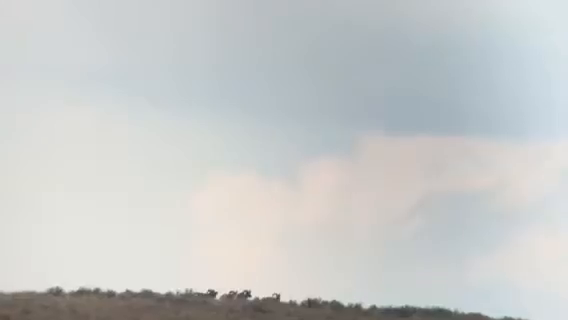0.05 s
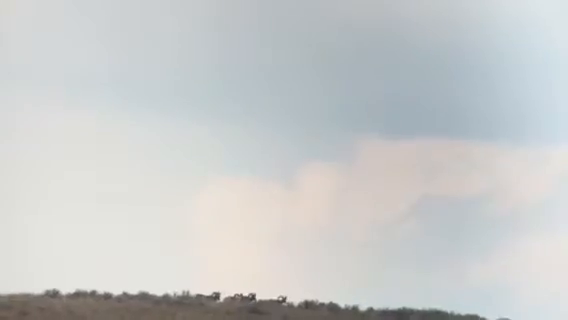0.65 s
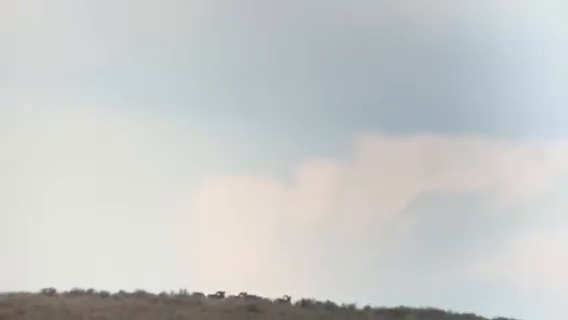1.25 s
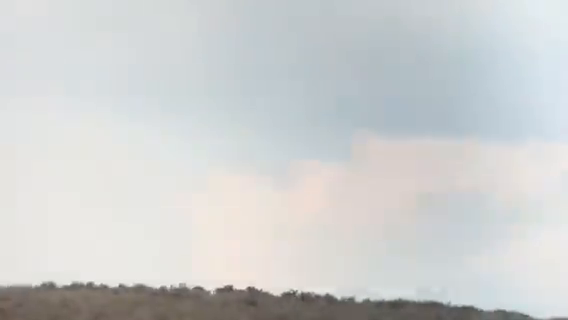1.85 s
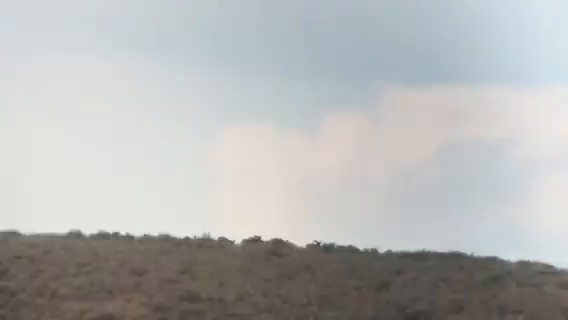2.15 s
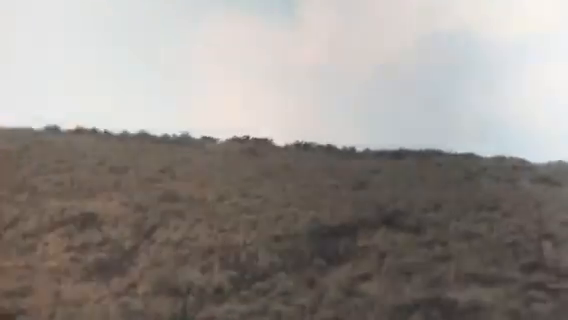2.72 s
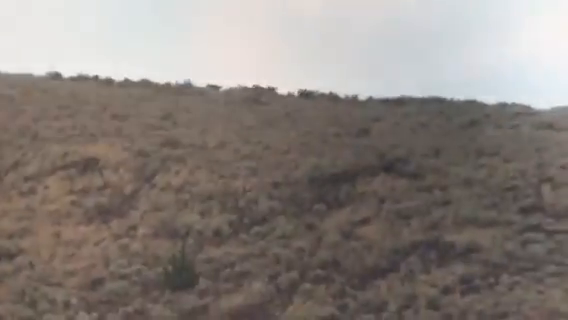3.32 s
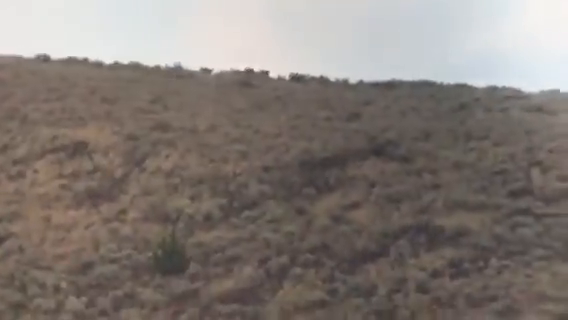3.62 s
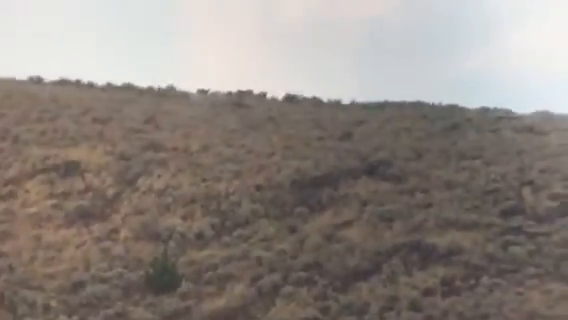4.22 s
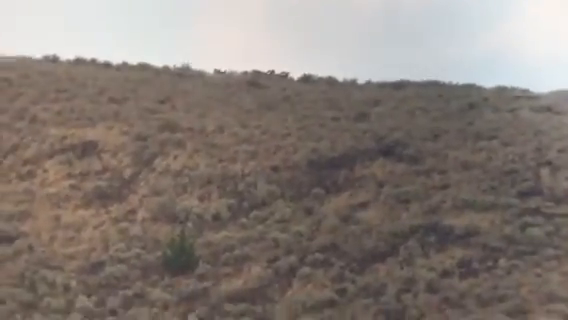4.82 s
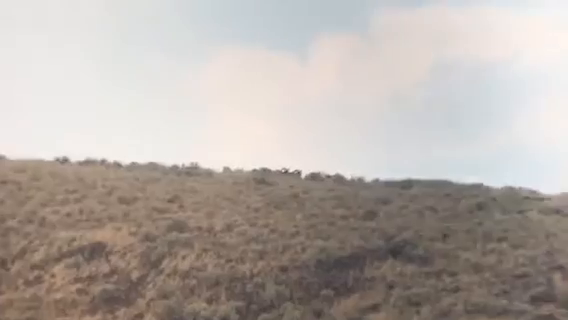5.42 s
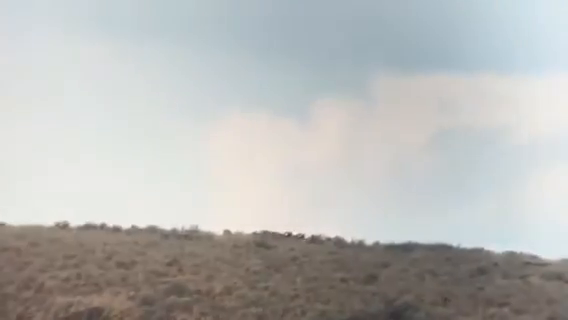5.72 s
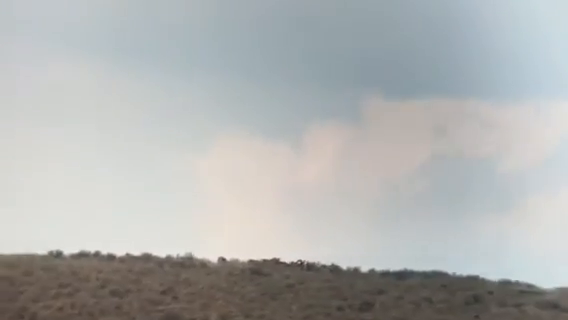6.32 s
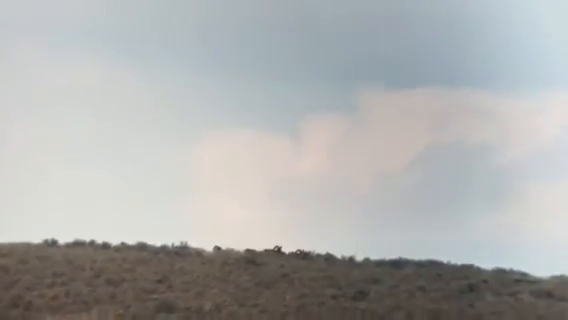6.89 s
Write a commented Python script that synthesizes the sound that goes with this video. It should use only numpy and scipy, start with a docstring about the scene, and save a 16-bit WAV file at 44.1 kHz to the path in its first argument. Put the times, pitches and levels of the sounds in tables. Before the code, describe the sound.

Strong, uneven wind thumps and roars against the microphone outdoors, drops into brief lulls with faint hiss, then returns.

```python
"""Gusty hillside wind blows across a small camera microphone: large eddies rumble on the port,
smaller ones roar, the smallest rasp in fast air. An early gust tears at the rim of the port, then
the wind runs strong, single eddies striking as short buffets. From about 3.7 s it eases, and its
lulls leave a far rush, a few faint peeps and a soft hiss. Just after 6 s it returns hard,
tearing at the rim again, and blows to the end."""
import sys
import numpy as np
from scipy import signal
from scipy.fft import rfft, irfft, next_fast_len
from scipy.io import wavfile
from scipy.ndimage import uniform_filter1d, map_coordinates

SR = 44100
rng = np.random.default_rng(int(sys.argv[2]) if len(sys.argv) > 2 else 0)


def wrap_up_sound(samples):
    """Save the sound to the file named by the first command line argument, as 16-bit audio."""
    columns = np.atleast_2d(samples).T
    # keep every value between -1 and 1, then stretch to whole-number steps
    tamed = np.clip(columns, -1, 1)
    steps = np.round(tamed * 32767).astype(np.int16)
    wavfile.write(sys.argv[1], SR, steps)


N = 315315


def wind():
    """Turbulent pressure on the port: a cascade of eddies, from deep rumble to fine fizz."""
    # the slow run of the wind: t/s, strength over the usual wind/dB, extra rumble/dB
    slow_run = [(0.0, -8.5, 6), (0.5, -1.0, 1.5), (0.68, 6.5, -1), (0.97, 1.5, -1.5), (1.1, 7.5, -1.5),
                (1.25, -2.5, 2.5), (1.48, -2, 1.5), (1.78, 2, -4), (2.16, -0.5, 3), (2.61, -7.5, -1),
                (2.93, -0.5, 2), (3.54, 0.5, 1.5), (3.7, -9.5, 4.5), (4.15, -9, -0.5), (4.6, -6.0, 0.5),
                (5.1, -8.5, 1), (5.69, -6.5, 4), (6.12, -11.5, 1.5), (6.26, 4, 3.5), (6.61, 1.0, -9),
                (7.01, 3.5, 4.5), (7.15, 3.5, 3.5)]
    # pressure spectra of five sizes of eddy, largest first: f/Hz, level/dB
    rumble_spectrum = [(18, -39.5), (28, -25), (40, -4.5), (54, -1), (78, 2), (125, -1.5), (190, -4.5),
                       (240, -18), (330, -51)]
    roar_spectrum = [(130, -46), (175, -9.5), (220, 2), (290, -1.5), (390, -4), (460, -8), (540, -23),
                     (700, -53)]
    rush_spectrum = [(350, -34), (460, -7.5), (520, 2), (600, -1.5), (700, -7.5), (820, -17.5), (1100, -50)]
    rasp_spectrum = [(500, -36), (660, -5), (770, -2.5), (930, -6), (1150, -16), (1400, -28.5), (2000, -62)]
    fizz_spectrum = [(850, -24.5), (1100, -4), (1300, -3), (1500, -11), (1750, -18), (2300, -34),
                     (3200, -52), (5000, -68)]
    run_db, weight_db = curves(slow_run)
    wind_db = run_db + gusts()
    surge_db = surges(wind_db)
    # small eddies gain most from faster air, then level off in the hardest gusts
    ceiling_db, knee_db = 5.5, 3
    capped_db = -knee_db * np.logaddexp(-wind_db / knee_db, -ceiling_db / knee_db)
    rumble_db = -35 + 0.64 * wind_db + weight_db + surge_db
    roar_db = -41 + wind_db + surge_db
    rasp_db = -58 + 2.34 * capped_db + surge_db
    thump, blast, scrape = buffets(stray_eddies(rumble_db, roar_db, rasp_db))
    # eddies come in clumps, so all sizes flutter together; the rumble also heaves on its own
    flutter = wobble(rate=85)
    heave = wobble(rate=49)
    rumble = np.sqrt(amp(rumble_db + 1.1 * flutter + 1.9 * heave) ** 2 + thump)
    roar = np.sqrt(amp(roar_db + 2.7 * flutter) ** 2 + blast)
    rasp = np.sqrt(amp(rasp_db + 0.76 * flutter) ** 2 + scrape)
    # the eddies between roar and rasp take their strength from both
    rush = amp(-0.5) * roar * (rasp / roar) ** 0.39
    # the finest eddies grow fastest, so hard gusts sound brighter
    fizz = amp(-66.5) * (rasp / amp(-48)) ** 1.6
    # the middle sizes also tumble, each on its own
    pressure = (rumble * carried(eddies(rumble_spectrum, life=0.022), wind_db)
                + roar * amp(2.13 * wobble(rate=90)) * eddies(roar_spectrum, life=0.025)
                + rush * amp(1.8 * wobble(rate=110)) * eddies(rush_spectrum, life=0.026)
                + rasp * amp(2.3 * wobble(rate=160)) * eddies(rasp_spectrum, life=0.0045)
                + fizz * eddies(fizz_spectrum, life=0.0028))
    return pressure * signal.windows.tukey(N, 0.002)


def eddies(spectrum, life):
    """An unbroken train of eddies: random in shape, about equal in strength over each life (s)."""
    x = noise(spectrum)
    colour = np.abs(rfft(x))
    span = max(int(life * SR), 2)
    for _ in range(2):
        power = uniform_filter1d(uniform_filter1d(x ** 2, span), span)
        even = rfft(x / np.sqrt(np.abs(power) + 1e-9))
        x = irfft(colour * even / (np.abs(even) + 1e-12), len(x))  # evening out keeps the colour
    return unit(x[:N])


def gusts():
    """Quick gusts and lulls that ride on the slow run of the wind, in dB of strength."""
    # gusts, and lulls where negative: middle t/s, half width/s, change of strength/dB
    swings = [(0.11, 0.011, -5.5), (0.228, 0.015, -11), (0.385, 0.038, 11), (0.514, 0.022, -9.5),
              (0.965, 0.023, -4), (1.618, 0.014, -3), (1.675, 0.012, -2.5), (1.905, 0.033, -7.5),
              (2.162, 0.032, -4.5), (2.377, 0.025, -13), (2.466, 0.018, 8), (2.538, 0.019, -5),
              (2.727, 0.017, 4.5), (2.822, 0.015, -4), (3.305, 0.013, -5), (3, 0.024, -13),
              (3.195, 0.021, -9.5), (3.385, 0.011, -9.5), (3.644, 0.026, -18.5), (3.89, 0.025, -8),
              (3.946, 0.029, 9), (4.136, 0.049, 7), (4.288, 0.013, -7), (4.459, 0.019, -4.5),
              (4.726, 0.068, -34), (4.965, 0.013, -8), (5.294, 0.037, -15.5), (5.372, 0.032, 17),
              (5.452, 0.04583, -31), (5.617, 0.044, 5), (5.766, 0.029, -17), (5.882, 0.0092, 6.5),
              (5.977, 0.029, -5), (6.378, 0.027, -8.5), (6.446, 0.038, 2.0), (6.89, 0.0098, -5.5)]
    t = np.arange(N) / SR
    return sum(db * swell((t - s) / width, rise=1) for s, width, db in swings)


def surges(wind_db):
    """Random surges in dB: light air comes in puffs, a strong wind flows more evenly."""
    depth_db = np.interp(wind_db, [-8, 4], [2.5, 1.78])
    return depth_db * wobble(rate=45)


def carried(rumble, wind_db, slow_air_db=-10):
    """Slow air carries eddies past more slowly: below slow_air_db the rumble drops in pitch."""
    pace = amp(0.15 * np.minimum(wind_db - slow_air_db, 0))
    return map_coordinates(rumble, [np.cumsum(pace)], order=1, mode="mirror")


def buffets(strays, attack_s=0.002, thump_lag_s=0.0037):
    """Power of thump, roar and rasp: an eddy hits fast and passes more slowly, its thump just behind."""
    # eddies that hit the port: peak t/s, thump/dB, roar/dB, rasp/dB, time to pass/s
    hits = [(0.006, -21, -26.5, -48.5, 0.018), (0.073, -22.5, -30, -70, 0.0064),
            (0.13, -29, -32.5, -61, 0.006), (0.168, -30, -37, -57.5, 0.011),
            (0.274, -31, -34.5, -56, 0.011), (0.337, -30.5, -34, -47, 0.015),
            (0.367, -18, -20.5, -42, 0.01), (0.407, -27, -32, -43, 0.014),
            (0.584, -36, -29.5, -47.5, 0.0053), (0.614, -18, -34, -51.0, 0.0098),
            (0.666, -17.5, -33, -52, 0.0064), (0.685, -27.5, -24.5, -41, 0.0079),
            (1.018, -24.5, -32.5, -44.5, 0.014), (1.207, -25.5, -31, -71, 0.0072),
            (1.269, -21.5, -38, -72, 0.0061), (1.327, -29.5, -29, -50.5, 0.015),
            (1.458, -25.5, -31.5, -59, 0.0064), (1.525, -38.5, -35, -54, 0.012),
            (1.585, -23.5, -33.5, -56.5, 0.0079), (1.639, -17.5, -25.5, -60, 0.0086),
            (1.708, -19.5, -34, -52, 0.0091), (1.745, -25, -33, -44.5, 0.019),
            (1.771, -21.5, -33.5, -40.5, 0.011), (1.847, -22, -30, -48.5, 0.0083),
            (1.944, -24.5, -31.5, -49, 0.012), (1.983, -30, -38, -46.5, 0.012),
            (2.022, -25.5, -41, -58, 0.01), (2.075, -30.5, -36, -64, 0.0079),
            (2.173, -23, -34.5, -58, 0.013), (2.225, -24.0, -30, -48.5, 0.013),
            (2.307, -23.5, -44, -72, 0.012), (2.334, -24.5, -42.5, -51.5, 0.0089),
            (2.437, -27, -28.5, -44.5, 0.011), (2.457, -14, -35, -48, 0.0074),
            (2.566, -34, -34.5, -62.5, 0.012), (2.673, -29.5, -41.5, -63, 0.026),
            (2.786, -25.5, -29, -56.5, 0.0075), (2.883, -42, -39, -48.5, 0.012),
            (3.244, -22, -26.5, -48, 0.011), (3.269, -25.5, -40.5, -52.5, 0.012),
            (3.308, -26, -45.5, -73, 0.008), (3.346, -25.5, -24.5, -50, 0.0064),
            (3.445, -34, -36.5, -58.5, 0.019), (3.524, -20, -29.5, -52, 0.022),
            (3.713, -29.5, -41, -82, 0.0055), (3.824, -34.5, -38, -62, 0.019),
            (3.847, -24, -35, -65.5, 0.0061), (3.944, -28, -40, -57, 0.0068),
            (3.961, -36, -36, -53, 0.0092), (4.017, -31, -50, -67.0, 0.016), (4.145, -44, -41, -48, 0.015),
            (4.183, -29.5, -39, -60.5, 0.013), (4.249, -31.5, -38.5, -72, 0.0089),
            (4.32, -34, -36, -55.5, 0.015), (4.37, -33, -32, -49.5, 0.0074), (4.41, -30, -36, -63, 0.017),
            (4.488, -23, -25.5, -47, 0.011), (4.504, -23, -47.5, -66.0, 0.0036),
            (4.636, -29, -40, -78, 0.012), (4.845, -47, -40, -68, 0.0097), (4.918, -27.5, -35, -64, 0.014),
            (4.992, -29, -37, -58.5, 0.011), (5.05, -21, -30, -56.5, 0.0076), (5.072, -23, -34, -59, 0.015),
            (5.151, -35, -36, -65.5, 0.025), (5.21, -25, -42, -71, 0.0046),
            (5.239, -25.5, -31.5, -66, 0.011), (5.351, -30.5, -31, -58, 0.008),
            (5.522, -29.5, -34, -60, 0.016), (5.597, -35, -27, -46.5, 0.021), (6.18, -27, -37, -66, 0.023),
            (6.233, -25.5, -24.5, -48.5, 0.0068), (6.247, -22.5, -36.5, -55.5, 0.0061),
            (6.281, -23.5, -25, -43, 0.01), (6.317, -26, -39.5, -56.5, 0.0068),
            (6.412, -27, -35, -46, 0.0085), (6.45, -24, -31, -50, 0.014), (6.469, -24.5, -29, -46.5, 0.014),
            (6.52, -26.5, -49, -64, 0.022), (6.728, -22.5, -32, -47.5, 0.021),
            (6.776, -26.5, -45, -46.0, 0.012), (6.839, -26.5, -39.5, -47.5, 0.011),
            (6.916, -23.5, -41.5, -46, 0.0067), (6.958, -24.5, -42, -56, 0.017),
            (6.991, -20.5, -28.5, -44.5, 0.012), (7.027, -28, -29.5, -51.5, 0.0089),
            (7.078, -34, -29.5, -51, 0.019)]
    t = np.arange(N) / SR
    thump, roar, rasp = np.zeros((3, N))
    for s, thump_db, roar_db, rasp_db, pass_s in list(hits) + strays:
        near = slice(max(int((s - 0.1) * SR), 0), int((s + 0.1) * SR))
        age = t[near] - s
        hit = swell(age / pass_s, rise=attack_s / pass_s)
        thump[near] += amp(thump_db) ** 2 * swell((age - thump_lag_s) / pass_s, rise=0.59)
        roar[near] += amp(roar_db) ** 2 * hit
        rasp[near] += amp(rasp_db) ** 2 * hit
    return thump, roar, rasp


def stray_eddies(rumble_db, roar_db, rasp_db, gap_s=0.12, pass_s=0.006, roar_limit_db=-41):
    """Rows of small extra buffets at random moments, as strong as the wind that carries them."""
    chance = rng.standard_normal((200, 3))
    times = gap_s * (np.arange(len(chance)) + chance[:, 0] / 2)
    accents_db = 2 + 0.9 * chance[:, 1:]
    rows = []
    for s, (low_db, high_db) in zip(times, accents_db):
        at = int(s * SR)
        if 0 <= at < N:
            trim_db = min(roar_limit_db - roar_db[at], 0)  # they stay small however hard it blows
            rows.append((s, rumble_db[at] + low_db + trim_db, roar_db[at] + high_db + trim_db,
                         rasp_db[at] + high_db + trim_db - 2.5, pass_s))
    return rows


def rim_tear():
    """A ragged edge on the hardest gusts, where the air tears at the rim of the port."""
    # crests of those gusts: t/s, half width/s, level/dB
    crests = [(0.377, 0.032, -65.5), (0.68, 0.013, -70.5), (2.463, 0.009, -68), (6.275, 0.02, -72),
              (6.456, 0.028, -66.5), (6.765, 0.035, -73), (6.996, 0.011, -69), (7.09, 0.02, -74.5)]
    # colour of the tearing air: f/Hz, level/dB
    spectrum = [(1100, -14), (1500, 1), (1800, -3), (2100, -5.5), (2400, -14), (2750, -26), (4000, -44)]
    t = np.arange(N) / SR
    strength = sum(amp(db) * swell((t - s) / width, rise=1) for s, width, db in crests)
    ragged = amp(2 * wobble(rate=260))
    return strength * unit(ragged * eddies(spectrum, life=0.0061))


def far_wind():
    """Wind in the brush further off: a soft rush that stays through the lulls."""
    # colour of the wind in the brush: f/Hz, level/dB
    spectrum = [(120, -3.5), (300, 0.5), (470, -7), (850, -11.5), (1100, -20), (1600, -33.5)]
    return amp(-72 + 1.5 * wobble(rate=3.9)) * noise(spectrum)[:N]


def peeps(half_length_s=0.01):
    """Short, slightly wavering notes, perhaps a far bird, that barely clear the hiss."""
    # the peeps: t/s, f/Hz, level/dB
    notes = [(0.93, 2040, -77), (2.228, 2150, -76), (2.5, 1990, -76), (2.61, 2210, -77.5),
             (2.853, 2230, -77), (3.04, 2200, -79), (4.9, 2120, -79), (5.706, 2394, -76),
             (6.062, 2060, -79)]
    t = np.arange(N) / SR
    waver = 1 + 0.014 * wobble(rate=90)
    phase_per_hz = 2 * np.pi * np.cumsum(waver) / SR
    return sum(amp(db) * swell((t - s) / half_length_s, rise=0.95) * np.sin(hz * phase_per_hz)
               for s, hz, db in notes)


def hiss():
    """A faint, broad bed of hiss under the wind."""
    # the hiss lifts a little during the quiet stretch: t/s, level/dB
    levels = [(0, -77), (3.2, -77), (4.2, -76.5), (6.1, -76.5), (6.6, -77.5)]
    # colour of the hiss: f/Hz, level/dB
    spectrum = [(100, 6), (900, -1), (2000, 2.5), (3000, 0), (4400, -1.5), (4950, -5), (5400, -2.5),
                (6700, -3.5), (7700, -6.5), (9300, -5), (10400, -10.5), (11400, -8), (15500, -11)]
    level_db, = curves(levels)
    return amp(level_db) * noise(spectrum)[:N]


def noise(spectrum):
    """Noise of rms 1 coloured by (f/Hz, level/dB) points, a little longer than the scene."""
    size = next_fast_len(N + 8192, real=True)
    hz, db = np.transpose(spectrum)
    log_hz = np.log(np.fft.rfftfreq(size, 1 / SR) + 1)
    gain = amp(np.interp(log_hz, np.log(hz), db, left=-120, right=-120))
    return unit(irfft(rfft(rng.standard_normal(size)) * gain, size))


def wobble(rate):
    """A smooth random curve, rate knots a second."""
    return map_coordinates(rng.standard_normal(4096), [np.arange(N) * rate / SR], mode="wrap")


def swell(age, rise):
    """A bell around age 0; rise is its front length as a share of its back."""
    return np.exp(-np.where(age < 0, age / rise, age) ** 2)


def curves(rows):
    """One value per sample for each column after the time."""
    times, *columns = np.transpose(rows)
    return [np.interp(np.arange(N) / SR, times, column) for column in columns]


def amp(db):
    """Decibels to gain."""
    return 10 ** (np.asarray(db) / 20)


def unit(x):
    """x at rms 1."""
    return x / np.sqrt(np.mean(x ** 2) + 1e-20)


def scene():
    """Wind on the port over hiss, far wind and peeps, in mono."""
    return (wind() + rim_tear() + hiss() + far_wind() + peeps())[None]


def record(dry):
    """The camera sheds the deepest bass and keeps nothing above its band limit."""
    low_cut_hz, top_hz = 38, 15700
    thinned = signal.sosfilt(signal.butter(3, low_cut_hz, "highpass", fs=SR, output="sos"), dry)
    size = next_fast_len(N + 8192, real=True)
    in_band = np.fft.rfftfreq(size, 1 / SR) < top_hz
    return irfft(rfft(thinned, size) * in_band, size)[..., :N]


dry = scene()
out = record(dry)
wrap_up_sound(out)
```